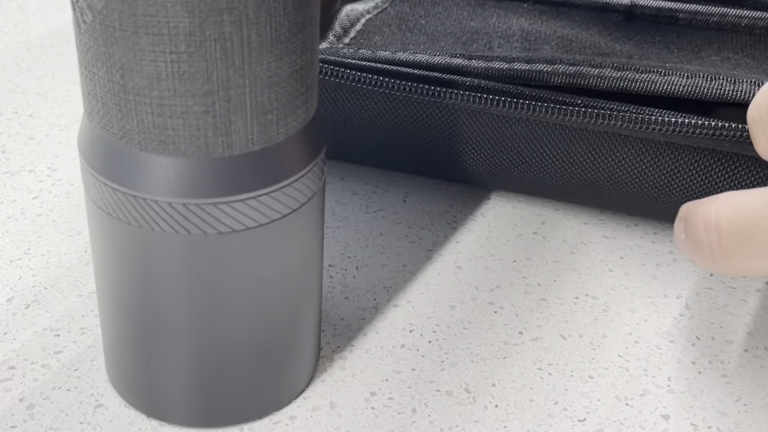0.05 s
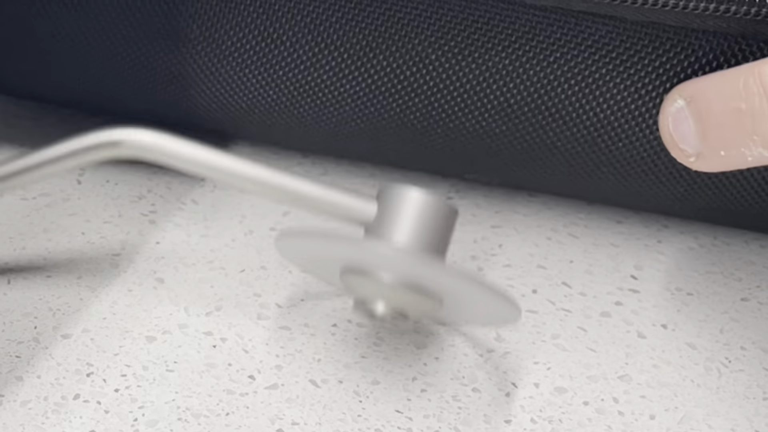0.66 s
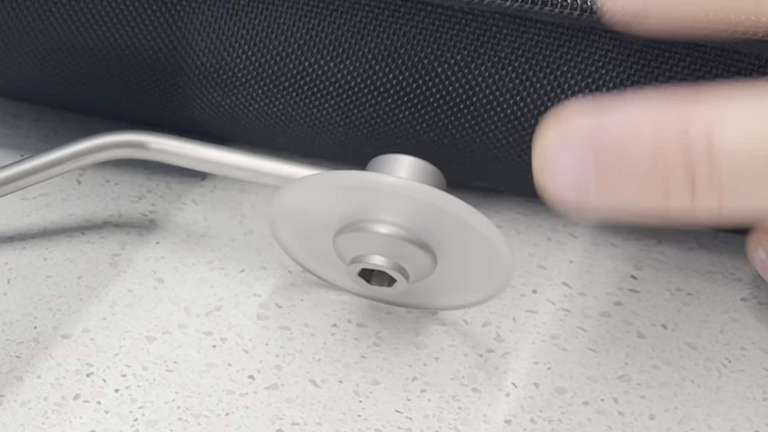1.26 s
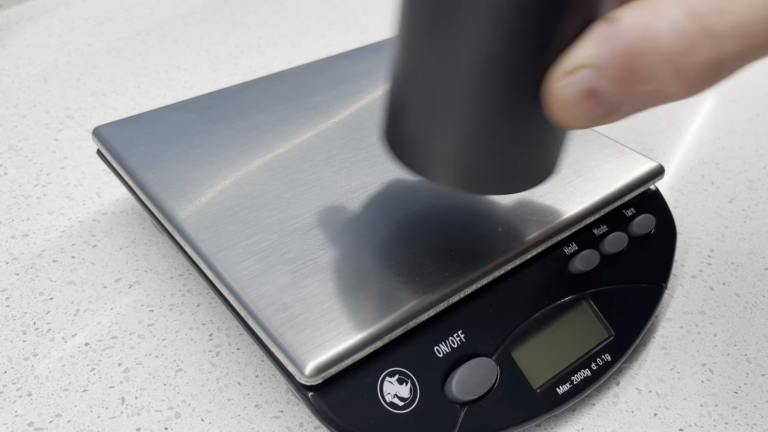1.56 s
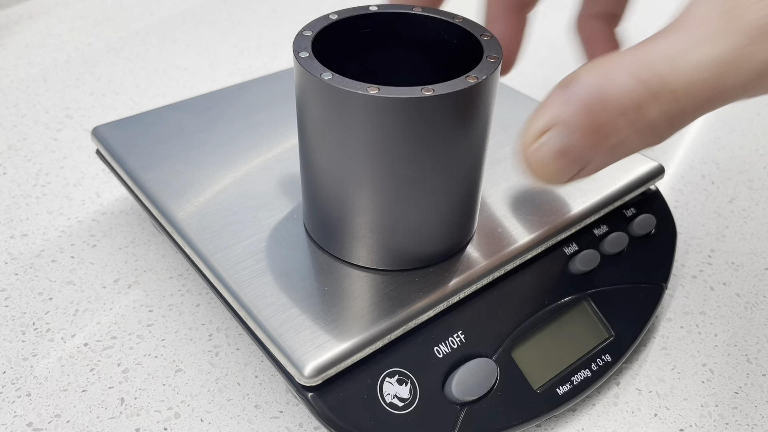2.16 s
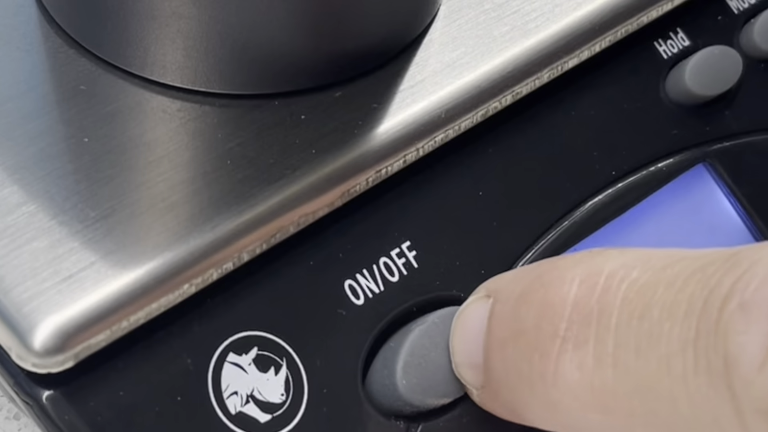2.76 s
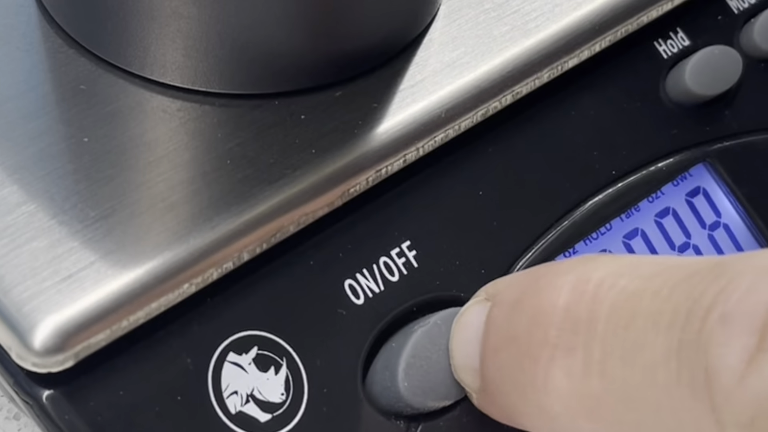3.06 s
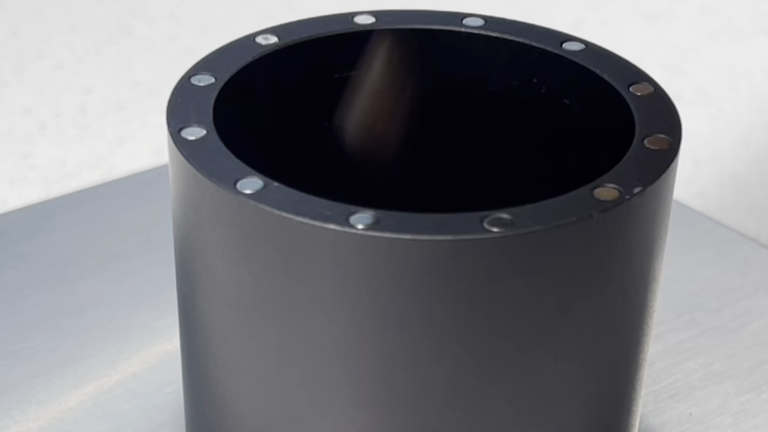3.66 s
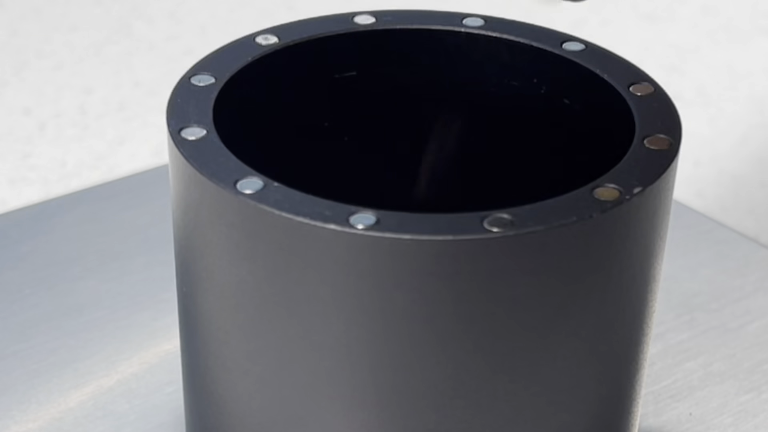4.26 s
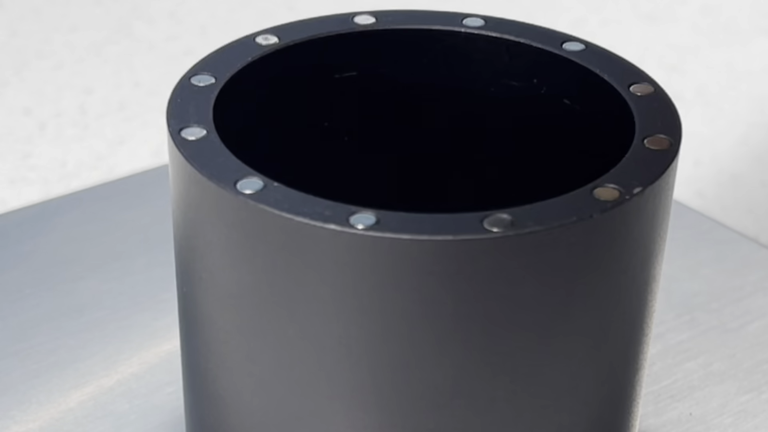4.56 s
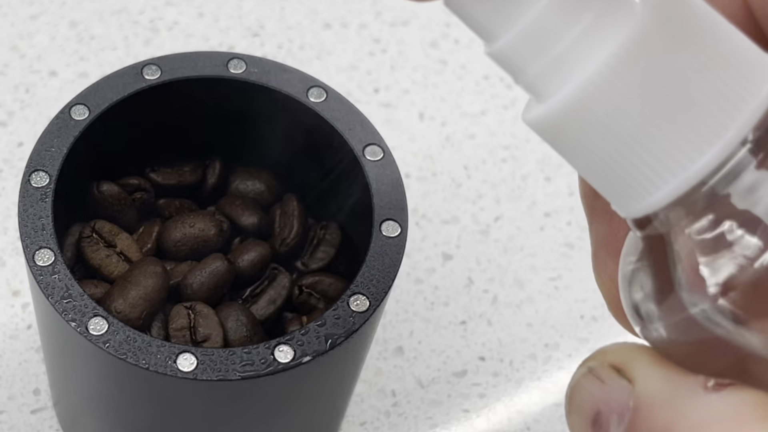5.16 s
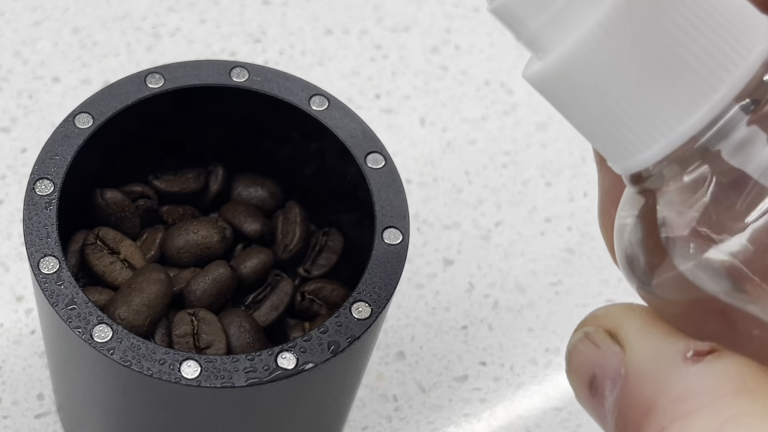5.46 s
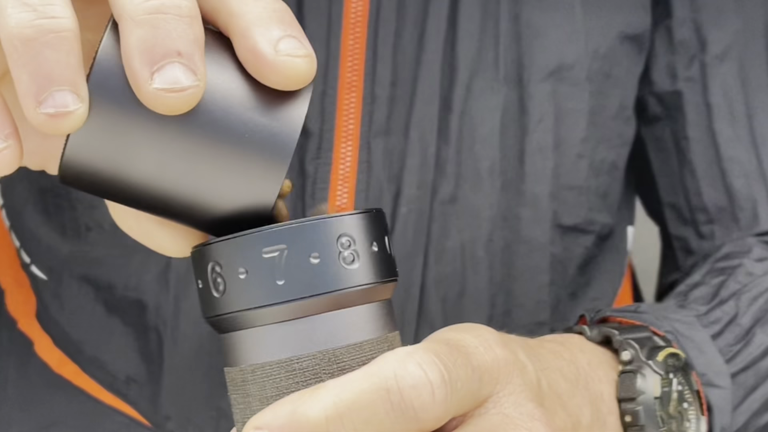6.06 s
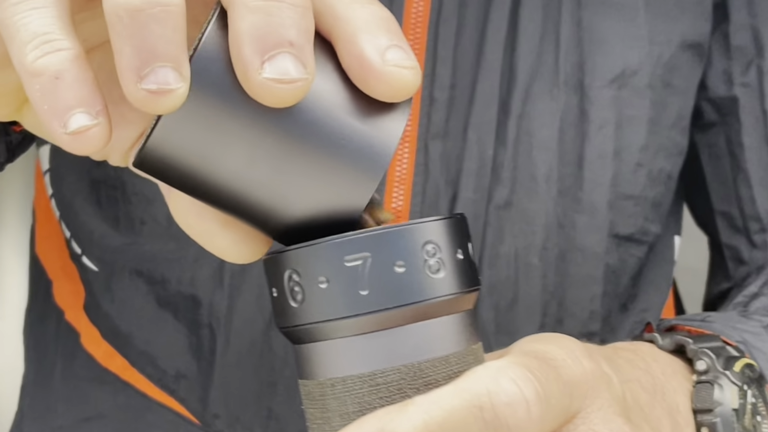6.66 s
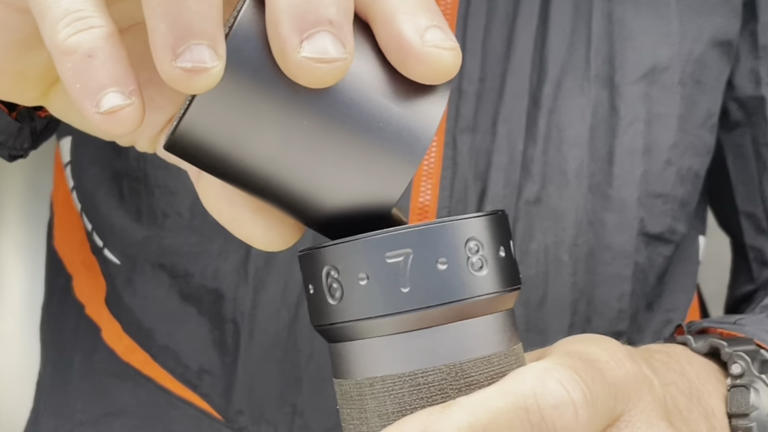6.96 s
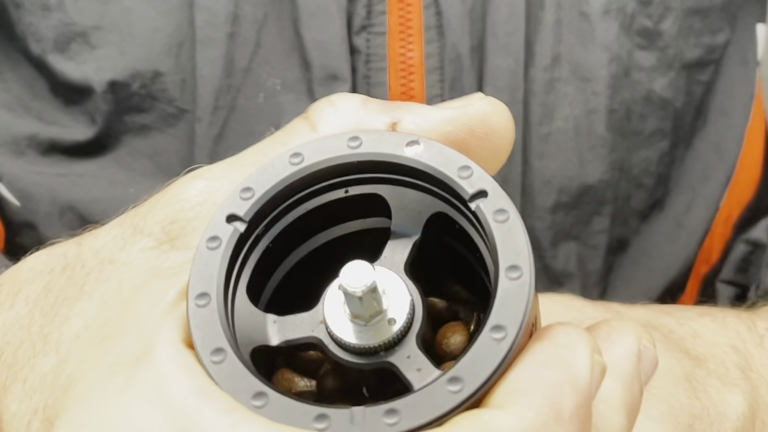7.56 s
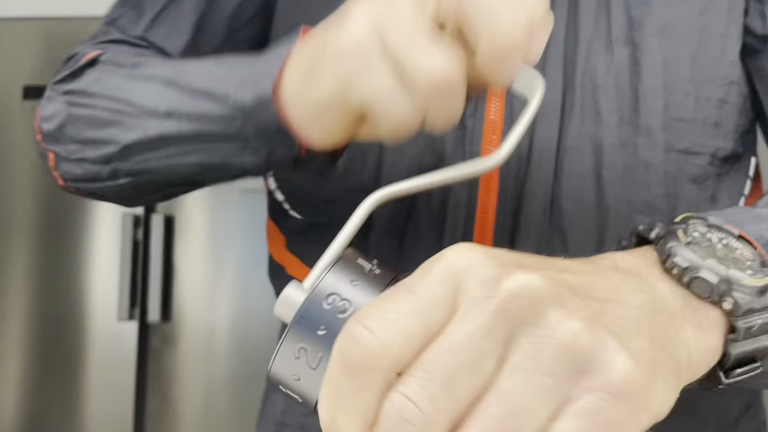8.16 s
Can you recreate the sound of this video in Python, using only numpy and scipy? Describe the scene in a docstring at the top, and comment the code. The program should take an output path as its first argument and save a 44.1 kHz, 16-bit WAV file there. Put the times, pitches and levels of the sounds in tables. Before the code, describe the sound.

A steel crank thuds onto a stone counter at 0.4 seconds, slides with a thin squeal, then clinks and clatters, loudest around 1 second. At 1.7 a cup knocks dully on a hollow scale, and its button clacks faintly near 2.6 and 3.1. From 3.6 to 4.7 coffee beans drop into the metal cup, bouncing, setting it ringing and settling. A pump sprayer mists at about 5.1 and 5.6, each time with a sharp knock, a short hiss and a springy snap back. From 6.1 to 7.1 beans rattle into a hand grinder's barrel with light metallic tings. Its dial gives nine quick, dry clicks between 7.2 and 7.7, and from 8 seconds the burrs briefly crunch beans. Everything is close to the microphone, over low kitchen rumble, hiss and hum that dip and shift between actions.

```python
"""A steel crank thuds, clinks and clatters onto a stone counter: coffee is being made with a hand grinder.
A metal cup knocks on a hollow scale and a button clacks. Beans drop in and set the cup ringing, a pump
sprayer mists them twice, and they rattle down into the grinder's barrel. The dial clicks from notch to
notch and the burrs start to crunch. All is close to a two-port microphone, over kitchen rumble, hiss
and hum; between actions the level dips briefly and the background shifts."""
import sys
import numpy as np
from scipy import signal
from scipy.fft import rfft, irfft, next_fast_len
from scipy.io import wavfile
from scipy.ndimage import uniform_filter1d

SR = 44100
rng = np.random.default_rng(int(sys.argv[2]) if len(sys.argv) > 2 else 0)


def bounce(signal):
    """Save signal as a 16-bit WAV file at the path given by the first command-line argument."""
    frames = np.transpose(np.atleast_2d(signal))
    limited = np.clip(frames, -1, 1)
    pcm = np.round(limited * 32767).astype(np.int16)
    wavfile.write(sys.argv[1], SR, pcm)


N = 366471
TIME = np.arange(N) / SR

LID_MODES = [(2960, -8, .07), (3420, 0, .05), (3478, -5, .055), (4550, -8, .04)]  # ring of the crank's lid: f/Hz, level/dB, t60/s
CRUNCH_COLOUR = [(150, -38.5), (500, -10.5), (900, -2.5), (1800, -2), (2700, -7), (4200, -11.5),
                 (5900, -6.5), (6900, -14.5), (7800, -8.5), (10000, -21), (11700, -17), (13500, -29),
                 (15800, -42)]  # beans crushed or shifting in a heap: f/Hz, level/dB
DIPS = [(0.245, 0.016), (1.483, 0.015), (2.248, 0.0099), (4.716, 0.023), (6.071, 0.025), (7.183, 0.0072),
        (8.004, 0.02)]  # brief dips in level between actions: t/s, half length/s


def crank():
    """The lid end clinks and bounces, then the steel arm clatters, reaching each port by its own paths."""
    arm_hits = [(0.9971, -14.5, 1), (1.009, -27, -1.5), (1.019, -25.5, -2.5), (1.028, -26, -4),
                (1.081, -30.5, -3), (1.4029, -42.5, -6), (1.4439, -52, -5)]  # the arm falls flat and rattles: t/s, level/dB, tilt/(dB/octave)
    arm_colour = [(60, -13.5), (330, 4.5), (650, -0.5), (1080, 7), (1700, -6), (2220, 7.5), (2700, -6),
                  (3600, -3.5), (6000, -16), (15500, -36)]  # its clatter: f/Hz, level/dB
    arm_modes = [(973, -3, .14), (1107, 3, .13), (1144, 0, .18), (1380, 2, .17), (2120, 10, .07),
                 (2210, 17, .04)]  # its ring: f/Hz, level/dB, t60/s
    clinks = [(0.7774, -25.5, 0, -26), (0.7862, -32, -3, -30.5), (0.8837, -39, -5, -42),
              (0.892, -40.5, -3.5, -45.5), (0.9371, -30, -4, -28), (0.9443, -34.5, -2.5, -31.5),
              (0.9997, -15, -0.5, -20.5), (1.0559, -15, 3, -26)]  # the lid end on stone: t/s, level/dB, tilt/(dB/octave), lid ring/dB
    clink_colour = [(200, -10.5), (700, -8.5), (1100, 3), (1900, -4), (3400, 2), (4400, 3.5), (5600, -11.5),
                    (11000, -15.5), (15500, -27)]  # its bright attack: f/Hz, level/dB
    hub_modes = [(3915, -1, .19), (3984, -2, .19), (4106, 1, .19), (10540, -9, .2), (11190, 4, .12)]  # the hub's ring: f/Hz, level/dB, t60/s
    clatter = np.zeros((2, N))
    for port in clatter:
        port += blows(arm_hits, arm_colour, chatter_s=0.004, chatter_db=5, modes=arm_modes, ring_db=-21)
        port += blows(clinks, clink_colour, chatter_s=0.0042, chatter_db=11.5,
                      modes=hub_modes, ring_db=-24)
    return diffuse(clatter) + rings(clinks, LID_MODES)


def knob():
    """The crank's knob thuds on stone, shaking the lid, and slides a little."""
    hits = [(0.392, -13, -1, -21), (0.4922, -35, -2.04, -34), (1.1639, -31, -5, -62)]  # knob on counter: t/s, level/dB, tilt/(dB/octave), lid ring/dB
    colour = [(25, -22), (100, 6.5), (200, -3.5), (350, 5), (620, 6), (1000, -4.5), (1800, -17.5),
              (2600, -13), (3800, -16.5), (4450, 2), (5400, -26), (6500, -3.5), (7200, -12), (9000, -23),
              (15000, -42.5)]  # its thud: f/Hz, level/dB
    modes = [(350, 11, 0.086), (4300, 12, 0.016), (6350, 19, .012)]  # its short ring: f/Hz, level/dB, t60/s
    thuds = blows(hits, colour, chatter_s=0.0036, chatter_db=5, modes=modes, ring_db=-24.5)
    return thuds + rings(hits, LID_MODES) + scrape()


def scrape(width_hz=520, overtone_ratio=1.36, overtone_db=-7, judder_db=3):
    """The lid sings as it slides: uneven friction feeds two resonances that glide up."""
    glide = [(0.521, 4300, -66.5), (.6, 4345, -55), (.66, 4580, -51.5), (.77, 4620, -63)]  # the lower resonance: t/s, f/Hz, level/dB
    s, hz, db = np.transpose(glide)
    grip = signal.sosfilt(signal.butter(2, width_hz / 2, fs=SR, output="sos"), rng.standard_normal((2, N)))
    judder = uniform_filter1d(rng.standard_normal(N), size=600)
    phase = 2 * np.pi * np.cumsum(np.interp(TIME, s, hz)) / SR
    song = grip[0] * np.sin(phase) + amp(overtone_db) * grip[1] * np.sin(overtone_ratio * phase)
    level_db = np.interp(TIME, s, db, left=-150, right=-150) + judder_db * judder / rms(judder)
    return amp(level_db) * song / rms(grip)


def filling():
    """Beans land, set the cup ringing, bounce about and settle."""
    beans = [(3.5966, -32.5, 7.5, -47.5), (3.6585, -20, 19.5, -33.5), (3.671, -27, 19, -52),
             (3.7238, -24.5, 7.5, -36), (3.742, -45, 2, -42), (3.7655, -33, 3.5, -56), (3.781, -33, 0, -61),
             (3.8548, -53, -13, -35), (3.8655, -27.5, 5, -53), (3.8923, -20.5, 4.5, -53),
             (3.9441, -24.5, 18.5, -39), (3.9797, -27, 1.5, -34), (4.0093, -26.5, 10, -46),
             (4.0313, -29.5, 5.5, -43), (4.0595, -26.5, 19, -54), (4.074, -31.5, 2.5, -54),
             (4.102, -32, 3, -65), (4.1401, -27, 7, -40.5), (4.168, -50, 12, -44.5),
             (4.1944, -32, 3.5, -34), (4.2441, -26, 5.5, -47), (4.3498, -32.5, 6, -45),
             (4.3776, -35, 5, -57), (4.6473, -40, -1.5, -79), (4.6915, -43, -1, -65)]  # the loudest landings: t/s, level/dB, tilt/(dB/octave), cup ring/dB
    bean_colour = [(50, -18.5), (130, 6.5), (300, 0), (700, -3.5), (1500, -2), (2300, -10.5), (3200, -14.5),
                   (5000, -10), (7000, -7), (11000, -11), (15800, -12.5)]  # bean on metal: f/Hz, level/dB
    cup_modes = [(4338, -11, .4), (4356, -14, .35), (11045, 0, .34), (11070, -8, .25), (11420, -7, .07)]  # the cup's ring: f/Hz, level/dB, t60/s
    stream = [(3.6, 4.13, -38, 0.0069, 0.094)]  # a handful streams in: start/s, end/s, relative level/dB, rise/s, fall/s
    shift = [(4.62, 4.7, -43.5, 0.029, 0.0047)]  # the heap shifts: start/s, end/s, level/dB, rise/s, fall/s
    bumps = [(0.262, -46.5), (3.546, -44), (3.56, -64), (4.42, -51.5), (4.632, -42.5)]  # soft handling bumps: t/s, level/dB
    bump_colour = [(40, -2.5), (100, 4.5), (300, -14), (1300, -15), (3000, -25.5), (15000, -35)]  # their low thump: f/Hz, level/dB
    landings = blows(beans, bean_colour, chatter_s=0.003, chatter_db=21) + rings(beans, cup_modes)
    bounces = amp(-6) * rattle(stream, bean_colour, per_s=500, spread_db=3, rub_db=-6)
    ticks = amp(-7) * grains(stream[0], low_hz=2000, high_hz=13000, cycles=1.6, spread_db=12, count=200)
    hollow = amp(-11) * grains(stream[0], low_hz=240, high_hz=900, cycles=1.2, spread_db=8, count=150)
    settling = rattle(shift, CRUNCH_COLOUR, per_s=350, spread_db=5, rub_db=-6)
    handling = blows(bumps, bump_colour, chatter_s=0.0134, chatter_db=11)
    return landings + bounces + ticks + hollow + settling + handling


def sprayer():
    """The plunger knocks, the nozzle hisses evenly until the stroke ends, and a spring snaps it back."""
    puffs = [(5.049, 5.156, -26.5), (5.64, 5.75, -27.5)]  # puffs of mist: start/s, end/s, level/dB
    mist_colour = [(200, -12), (500, -5), (800, -12), (1300, -13.5), (2100, -6.5), (3000, -3.5), (4000, 0),
                   (5500, 1.5), (7000, -2), (9000, 4), (11000, -1), (12500, -4), (15500, -10.5)]  # the nozzle's hiss: f/Hz, level/dB
    strokes = [(5.0511, -12.5, -1), (5.2016, -35, -5.5), (5.2271, -44, 14), (5.4717, -46.5, 12.5),
               (5.6435, -13.5, 0), (5.7972, -34, -4.5), (5.824, -40.5, 11), (5.9072, -47, -1.5)]  # the plunger goes down and is let go: t/s, level/dB, tilt/(dB/octave)
    pump_colour = [(100, -23.5), (250, -26), (480, 1), (720, -0.5), (1050, -17), (1350, -4.5), (1700, -9),
                   (1970, 5), (2190, 7), (2600, -11.5), (3000, 0), (3500, -6.5), (6000, -21),
                   (10000, -19.5), (15000, -47)]  # its knock: f/Hz, level/dB
    stops = [(5.2785, -35.5), (5.8712, -30.5)]  # it springs back against the stop: t/s, level/dB
    stop_colour = [(300, -7), (1400, -6.5), (2200, 7), (3000, 7), (4500, -14.5), (12000, -33)]  # that snap: f/Hz, level/dB
    jet = sum(amp(db) * gate(start, end, edge_s=0.0028) for start, end, db in puffs)
    mist = jet * coloured(rng.standard_normal(N), mist_colour)
    snaps = blows(stops, stop_colour, chatter_s=0.0026, chatter_db=0)
    return mist + snaps + blows(strokes, pump_colour, chatter_s=0.0019, chatter_db=-3.5)


def pouring():
    """Damp beans slide off the cup into the barrel; the rim tings whenever it is touched or rubbed."""
    surges = [(6.088, 6.25, -44, 0.0022, 0.044), (6.41, 6.87, -35, 0.26, 0.066),
              (6.96, 7.14, -45, 0.018, 0.024)]  # one per tip of the cup: start/s, end/s, relative level/dB, rise/s, fall/s
    tumbles = [(6.1267, -36.5), (6.2803, -38), (6.4157, -40), (6.4817, -38.5), (6.8258, -48),
               (6.9705, -34.5), (6.9962, -36), (7.0804, -37.5), (7.1329, -37)]  # the loudest beans to fall in: t/s, level/dB
    barrel_colour = [(300, -42), (600, -20), (850, -12), (960, -2.5), (1160, -4.5), (1340, -16.5),
                     (1650, -16.5), (1960, -0.5), (2150, -5), (2500, -10.5), (3000, -1.5), (3600, -4.5),
                     (4600, -2.5), (5250, 4.5), (5900, -8), (6400, -3.5), (10800, 1.5), (15800, -5.5)]  # the grinder's hollow barrel: f/Hz, level/dB
    rim_colour = [(3000, -54), (4150, -12), (4340, -8), (4520, -20), (6000, -43)]  # the rim under sliding beans: f/Hz, level/dB
    rim_modes = [(4340, 6, 0.2), (11040, -26, .2)]  # the rim ringing freely: f/Hz, level/dB, t60/s
    touches = [(3.854, -45), (4.178, -57), (6.394, -53), (6.432, -55), (7.121, -54), (7.149, -57)]  # a bean or the grinder taps it: t/s, level/dB
    rubs = [(1.87, -64.5, 0.027), (4.215, -39.5, 0.015), (4.469, -60, 0.027)]  # a finger or a rolling bean makes it sing: t/s, level/dB, rise/s
    out = amp(-2) * rattle(surges, barrel_colour, per_s=800, spread_db=7, rub_db=-8.5)
    out += amp(-19) * rattle(surges, rim_colour, per_s=80, spread_db=5, rub_db=14)
    for s, db in touches:
        add(out, s, amp(db) * ring(rim_modes))
    for s, db, rise_s in rubs:
        ting = ring(rim_modes)
        attack = (1 - np.exp(-TIME[:len(ting)] / rise_s)) ** 2
        add(out, s, amp(db) * ting * attack)
    return out + blows(tumbles, barrel_colour, chatter_s=0.0046, chatter_db=2.5)


def dial(knock_db=-7, knock_t60=0.0074, room_db=-12):
    """A sprung pin snaps dryly from notch to notch; each click has its own knock and reflections."""
    detents = [(7.199, -30, -1.2), (7.2617, -26.5, -0.09), (7.3294, -26.5, 0.41), (7.371, -27, -1.6),
               (7.4294, -26, -0.18), (7.4842, -26.5, 1.3), (7.5344, -26.5, 1.5), (7.5661, -27, -0.029),
               (7.638, -26.5, 0.68)]  # notches of the grind setting: t/s, level/dB, tilt/(dB/octave)
    colour = [(200, -19), (1200, -22.5), (2200, -8), (3500, -10), (5000, -3.5), (6300, -8), (7800, 4.5),
              (9200, -3), (10800, 1), (12300, -11.5), (16000, -8)]  # the pin's snap: f/Hz, level/dB
    click_modes = [(7640, 1.3, 0.0049), (10500, 6.2, 0.0066)]  # its tiny ring: f/Hz, level/dB, t60/s
    knock_pitches = [2900, 2700, 2340, 2500, 2200, 1920, 2500, 2220, 1940]  # the knock under each click: f/Hz
    out = np.zeros((2, N))
    for (s, db, tilt), hz in zip(detents, knock_pitches):
        modes = click_modes + [(hz, knock_db, knock_t60)]
        click = blows([(0.0012, db, tilt)], colour, chatter_s=0.0029, chatter_db=1, modes=modes)[:SR // 10]
        for side, echo in zip(out, kitchen(click, early_db=-13, early_s=0.004)):
            add(side, s, click)
            add(side, s, amp(room_db) * echo)
    return out


def grinding():
    """Dense fractures between the burrs, with a few whole beans cracking."""
    bite = [(8.016, 8.31, -34.5, 0.015, .05)]  # the burrs bite: start/s, end/s, level/dB, rise/s, fall/s
    chewing = [(8.045, 8.23, -40.5, 0.0091, .01)]  # coarse pieces are chewed up: start/s, end/s, level/dB, rise/s, fall/s
    cracks = [(8.1275, -32, 0), (8.1312, -51, 2), (8.168, -44, -1), (8.1872, -32, 1), (8.2475, -29, -2.5),
              (8.286, -36, 9), (8.3, -31, 0)]  # whole beans split: t/s, level/dB, tilt/(dB/octave)
    crunch = rattle(bite, CRUNCH_COLOUR, per_s=1000, spread_db=3.5, rub_db=-7)
    crunch += grains(chewing[0], low_hz=1500, high_hz=2000, cycles=5, spread_db=14, count=30)
    return crunch + blows(cracks, CRUNCH_COLOUR, chatter_s=0.0032, chatter_db=16)


def scale():
    """The hollow scale answers the cup with a dull knock, the finger with a soft bump; its button clacks."""
    cup_down = [(1.7112, -28.5)]  # the cup is set on the scale: t/s, level/dB
    case_colour = [(50, -12), (110, -2.5), (300, -6.5), (620, -7), (950, -27), (2200, -28), (4000, -30.5),
                   (7000, -36.5), (15000, -81)]  # the hollow case: f/Hz, level/dB
    case_modes = [(108, -1, .17), (307, -11, .16), (400, -12, .15), (480, -8, .15), (544, -4, .19),
                  (608, -6, .18), (635, 16, .03), (668, -11, .19)]  # its low ring: f/Hz, level/dB, t60/s
    presses = [(2.4963, -57.5), (3.073, -59.5)]  # a fingertip lands and lifts off: t/s, level/dB
    press_colour = [(200, -19), (500, -11), (720, 3.5), (1050, -21), (2200, -19.5), (12000, -49)]  # its soft bump: f/Hz, level/dB
    clacks = [(2.5788, -54.5), (2.594, -52.5), (2.6425, -56.5), (3.099, -59)]  # the power button: t/s, level/dB
    clack_colour = [(200, -14), (700, -3.5), (1300, -0.5), (2200, -2.5), (4000, -11), (7000, -17),
                    (15000, -29)]  # its clack: f/Hz, level/dB
    knock = blows(cup_down, case_colour, chatter_s=0.0076, chatter_db=11.5, modes=case_modes, ring_db=-6.5)
    finger = blows(presses, press_colour, chatter_s=0.017, chatter_db=20)
    return knock + finger + blows(clacks, clack_colour, chatter_s=0.026, chatter_db=7.5)


def room_tone(rise_share=0.17, fall_s=0.07):
    """Rumble and hiss hold steady from dip to dip; moving hands add rumble and rustle."""
    beds = [(-51, -65), (-47, -57.5), (-68.5, -80), (-67, -77.5), (-61.5, -82), (-59.5, -71), (-75, -81),
            (-68, -77)]  # one row per stretch between dips: rumble/dB, hiss/dB
    moves = [(0.18, 0.216, -71, -57.5), (1.45, 1.702, -61, -65.5), (2.11, 2.27, -64, -62.5),
             (2.244, 2.374, -65.5, -66), (2.42, 2.668, -68, -71.5), (3.0, 3.541, -70, -60.5),
             (3.553, 4.138, -58, -50), (4.497, 4.667, -54.5, -57.5), (7.16, 7.348, -62, -58.5),
             (7.59, 7.893, -80, -72.5)]  # hands and sleeves: start/s, end/s, rumble/dB, rustle/dB
    rumble_colour = [(20, -27.5), (45, -3), (80, 4.5), (150, 0), (250, -10), (400, -14.5), (800, -20.5),
                     (1600, -25.5)]  # the kitchen's low end: f/Hz, level/dB
    hiss_colour = [(300, 2), (700, -7), (1750, -6), (2300, -5), (3300, -7), (7000, -10.5), (10000, -14),
                   (15000, -22.5)]  # hiss and rustle: f/Hz, level/dB
    dip_times = [s for s, _ in DIPS]
    stretch = np.searchsorted(dip_times, TIME)
    rumble, hiss = amp(beds)[stretch].T
    for start, end, rumble_db, rustle_db in moves:
        own_stretch = stretch == np.searchsorted(dip_times, (start + end) / 2)
        move = swell(start, end, 0, rise_share * (end - start), fall_s) * own_stretch
        rumble = np.hypot(rumble, amp(rumble_db) * move)
        hiss = np.hypot(hiss, amp(rustle_db) * move)
    air = np.zeros((2, N))
    lowpass = signal.butter(2, 900, fs=SR, output="sos")
    for side in air:
        side += rumble * signal.sosfilt(lowpass, coloured(rng.standard_normal(N), rumble_colour))
        side += hiss * coloured(rng.standard_normal(N), hiss_colour)
    return diffuse(air)


def hum(waver_db=1.2, drift_rad=0.4):
    """Low hums come and go, wavering in level and phase."""
    tones = [(0, 0.254, 271, -55), (0.268, 0.573, 141.8, -37.5), (0.557, 1.008, 141.4, -45.5),
             (1.021, 1.463, 146.5, -38.5), (1.273, 1.468, 77.5, -40), (4.717, 6.08, 270.5, -57.5),
             (6.1, 7.15, 270, -64)]  # background hums: start/s, end/s, f/Hz, level/dB
    out, knots = np.zeros(N), np.linspace(0, TIME[-1], 100)
    for start, end, hz, db in tones:
        waver, drift = (np.interp(TIME, knots, rng.standard_normal(len(knots))) for _ in range(2))
        tone = np.sqrt(2) * np.sin(2 * np.pi * hz * TIME + drift_rad * drift)
        out += amp(db + waver_db * waver) * gate(start, end, edge_s=0.015) * tone
    return out


def kitchen(x, gap_s=0.00066, early_db=5, early_s=0.012):
    """Reflections: strong early ones from counter and cupboards, then a tail that dies band by band."""
    decay_times = [(100, 0.97), (550, 0.5), (2000, .5), (5000, 0.4), (10000, 0.35), (16000, 0.26)]  # the room's decay: f/Hz, t60/s
    t = TIME[:SR]
    taps = rng.standard_normal((2, SR)) * (rng.random((2, SR)) < 0.12) * (t > gap_s)
    taps *= 1 + amp(early_db) * np.exp(-t / early_s)
    hz, frame_s, bands = signal.stft(diffuse(taps), SR, nperseg=256)
    decay = np.exp(-np.log(1000) * frame_s / curve(decay_times, hz)[:, None])
    tail = signal.istft(bands * decay, SR, nperseg=256)[1]
    return signal.oaconvolve(np.atleast_2d(x), tail / np.linalg.norm(tail[0]), axes=1)[:, :N]


def diffuse(pair):
    """Makes two unrelated signals as alike as a diffuse field is at the two ports."""
    coherence = [(100, 0.97), (300, 0.6), (1100, 0.27), (1900, 0.73), (3000, 0.48), (6500, 0.92), (8200, 1),
                 (15000, 0.49)]  # the room at the ports: f/Hz, left-right likeness/(0 to 1)
    size = next_fast_len(pair.shape[1])
    left, other = rfft(pair, size)
    likeness = np.clip(curve(coherence, np.fft.rfftfreq(size, 1 / SR)), -1, 1)
    right = likeness * left + np.sqrt(1 - likeness ** 2) * other
    return irfft([left, right], size)[:, :pair.shape[1]]


def blows(hits, colour, chatter_s, chatter_db, modes=(), ring_db=0):
    """Each blow is one push and a dying chatter of the contact, through the body; its modes ring on."""
    out, t = np.zeros(N), TIME[:SR // 10]
    for s, db, *extra in hits:
        tilt = extra[0] if extra else 0
        contact = rng.standard_normal(len(t)) * np.exp(-t / chatter_s)
        contact *= amp(chatter_db) / np.linalg.norm(contact)
        contact[0] = 1  # the push
        knock = signal.fftconvolve(contact, body(colour, tilt))
        add(out, s, amp(db) * knock / rms(knock[:220]))  # the first 5 ms set the level
        if modes:
            add(out, s, amp(db + ring_db) * ring(modes, tilt))
    return out


def rattle(flows, colour, per_s, spread_db, rub_db):
    """Many small collisions of uneven size over a little rubbing, following the flow."""
    sizes = amp(spread_db * np.minimum(rng.exponential(1, N), 3)) * rng.choice([-1, 1], N)
    ticks = sizes * (rng.random(N) < per_s / SR)
    drive = ticks / rms(ticks) + amp(rub_db) * rng.standard_normal(N)
    return coloured(drive, colour) * sum(swell(*flow) for flow in flows)


def grains(flow, low_hz, high_hz, cycles, spread_db, count):
    """Separate knocks scattered through a flow, each with its own pitch and size."""
    out, t = np.zeros(N), TIME[:SR // 20]
    start, hold_end, _, _, fall_s = flow
    end = hold_end + 2 * fall_s
    for k, (place, pitch, size) in enumerate(rng.random((count, 3))):
        turns = t * low_hz * (high_hz / low_hz) ** pitch
        knock = np.sin(2 * np.pi * turns) * np.exp(-turns / cycles)
        add(out, start + (end - start) * (k + place) / count, amp(spread_db * size) * knock)
    return out / rms(out[round(start * SR):round(end * SR)]) * swell(*flow)


def ring(modes, tilt=0):
    """Dying modes, the high ones louder after a bright blow; each blow meets them in another phase."""
    t = TIME[:SR // 2]
    return sum(amp(db + tilt * np.log2(hz / 4000) / 2 - 60 * t / t60)
               * np.sin(2 * np.pi * (hz * t + rng.random())) for hz, db, t60 in modes)


def rings(hits, modes):
    """Each blow sets a part ringing, at the level in its last column."""
    out = np.zeros(N)
    for s, *_, db in hits:
        add(out, s, amp(db) * ring(modes))
    return out


def body(colour, tilt=0, size=4096):
    """Minimum-phase impulse response of a colour, tilted in dB per octave about 2 kHz."""
    hz = abs(np.fft.fftfreq(size, 1 / SR))
    db = curve(colour, hz) + tilt * np.log2(np.clip(hz, 500, 12000) / 2000)
    spectrum = np.exp(np.conj(signal.hilbert(np.log(amp(db)))))
    return np.fft.ifft(spectrum).real[:size // 2]


def coloured(drive, colour):
    """A drive passed through a body, at unit level."""
    sound = signal.oaconvolve(drive, body(colour))[:N]
    return sound / rms(sound)


def swell(start, end, db, rise_s, fall_s):
    """Gain of a motion that builds up from its start, holds, and dies away after its end."""
    attack = 1 - np.exp(-np.maximum(TIME - start, 0) / rise_s)
    release = np.exp(-np.maximum(TIME - end, 0) / fall_s)
    return amp(db) * attack * release


def gate(start, end, edge_s):
    """Open between two times, with sloping edges."""
    return np.clip(np.minimum(TIME - start, end - TIME) / edge_s + 0.5, 0, 1)


def curve(points, hz):
    """A table's value along a log-frequency axis."""
    f, value = np.transpose(points)
    return np.interp(np.log(hz + 1), np.log(f + 1), value)


def add(mix, s, sound):
    """Mixes a sound in at time s."""
    part = mix[max(round(s * SR), 0):][:len(sound)]
    part += sound[:len(part)]


def amp(db):
    """Decibels to gain."""
    return 10 ** (np.asarray(db) / 20)


def rms(x):
    """Root mean square."""
    return np.sqrt(np.mean(x ** 2) + 1e-20)


def scene():
    """Sources arrive directly and through the room; those before the dial are faded out at a dip."""
    # sound, reverb send/dB, the dip that ends it
    sources = [(knob(), -9.5, DIPS[1]), (crank(), -5, DIPS[1]), (scale(), -9, DIPS[3]),
               (filling(), -4, DIPS[3]), (sprayer(), -12, DIPS[4]), (pouring(), -4, DIPS[5])]
    out = sum((sound + amp(send_db) * kitchen(sound)) * gate(-1, dip_s, edge_s=0.025)
              for sound, send_db, (dip_s, _) in sources)
    crunch = grinding()
    return out + dial() + crunch + amp(-5.5) * kitchen(crunch) + room_tone() + hum()


def record(dry, low_cut_hz=42, top_hz=16100, dip_floor=0.11):
    """A low cut and each port's phase and level; then the sound dips at each edit and the top is cut off."""
    balance = [(100, 1), (1200, 2), (2200, 2), (4500, 4.5), (7000, 0.5), (16000, -1)]  # level between the ports: f/Hz, left minus right/dB
    phase_lead = [(100, 0), (1500, .1), (3000, .9), (5200, .8), (6700, -1.1), (8250, -3.14), (10700, -5.6),
                  (12000, -6.5), (15200, -9.3)]  # phase between the ports: f/Hz, left lead/rad
    size = next_fast_len(N + SR // 10)
    hz = np.fft.rfftfreq(size, 1 / SR)
    left = amp(curve(balance, hz) / 2) * np.exp(0.5j * curve(phase_lead, hz))
    ports = np.array([left, 1 / left])
    ports /= np.sqrt(np.mean(abs(ports) ** 2, axis=0))
    dry = signal.sosfilt(signal.butter(3, low_cut_hz, "highpass", fs=SR, output="sos"), dry)
    out = irfft(rfft(dry, size) * ports, size)[:, :N]
    for s, half_s in DIPS:
        out *= np.minimum(dip_floor + ((TIME - s) / half_s) ** 2, 1)
    band_limit = signal.firwin(255, top_hz, window=("kaiser", 9), fs=SR)
    return signal.oaconvolve(np.clip(out, -1, 1), band_limit[None], "same")


dry = scene()
out = record(dry)
bounce(out)
```